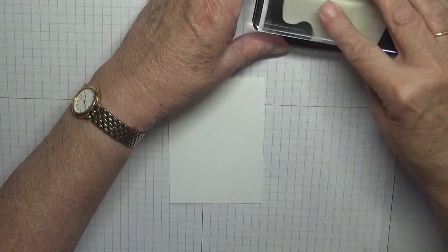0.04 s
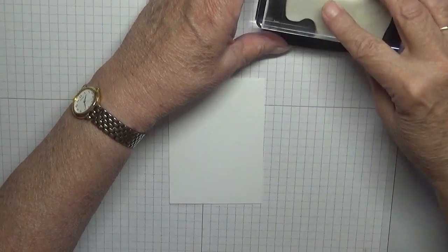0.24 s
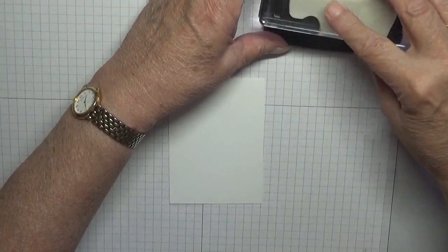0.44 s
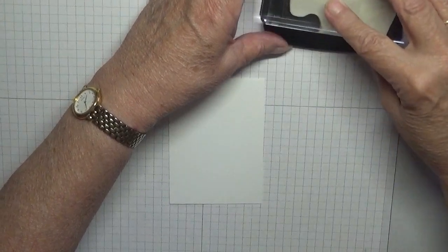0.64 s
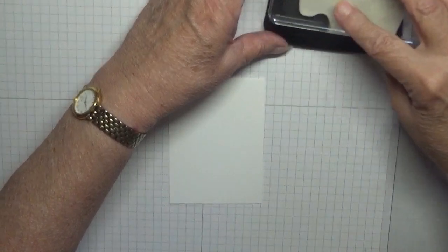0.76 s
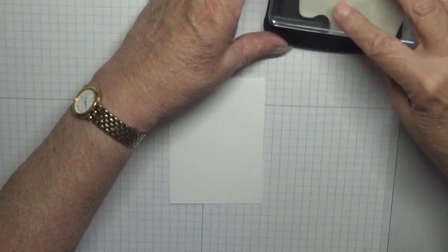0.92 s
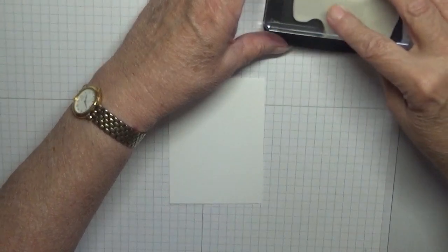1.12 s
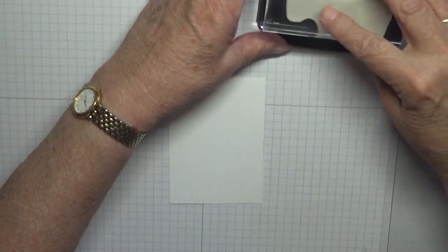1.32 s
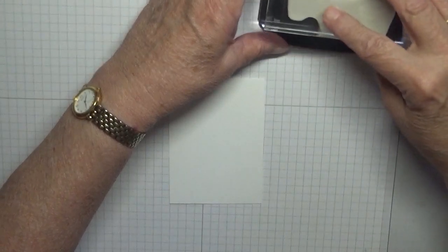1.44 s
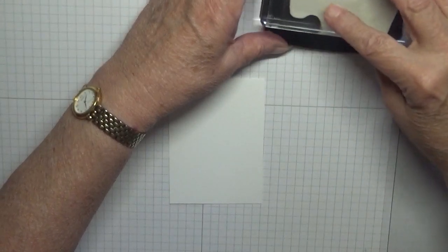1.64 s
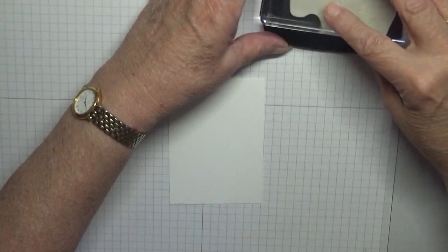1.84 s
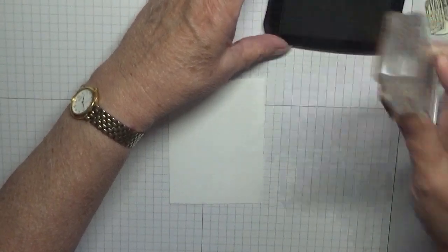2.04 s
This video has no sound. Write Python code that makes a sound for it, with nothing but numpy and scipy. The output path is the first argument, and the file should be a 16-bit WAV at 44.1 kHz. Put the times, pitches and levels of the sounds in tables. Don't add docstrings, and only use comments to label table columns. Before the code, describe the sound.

Quick hollow plastic knocks and low table thumps as a stamp block dabs an ink pad

```python
import sys
import numpy as np
from scipy import signal
from scipy.fft import rfft, irfft, next_fast_len
from scipy.io import wavfile

SR = 44100
rng = np.random.default_rng(int(sys.argv[2]) if len(sys.argv) > 2 else 0)


def wav_record(signal):
    frames = np.transpose(np.atleast_2d(signal))
    bounded = np.clip(frames, -1, 1)
    quanta = np.round(bounded * 32767).astype(np.int16)
    wavfile.write(sys.argv[1], SR, quanta)


def elevation(decibels):
    levels = np.asarray(decibels, float)
    return 10 ** (levels / 20)


N = 91463

KNOCK_RISE_S = .0007
ROOM_LAG_S = .002
WET_CLICK_DB, WET_KNOCK_DB, WET_THUMP_DB = -9.5, -13, -23


def unit(x):
    return x / np.sqrt(np.mean(x ** 2) + 1e-20)


def along(points, hz):
    f, value = np.transpose(points)
    return np.interp(np.log(hz + 1), np.log(f + 1), value)


def bump(hz, centre_hz, db, octaves):
    return db * np.exp(-.5 * (np.log2((hz + 1) / centre_hz) / octaves) ** 2)


def detuning(hz, centre_hz):
    return (hz + 1) / centre_hz - centre_hz / (hz + 1)


def filtered(x, response):
    m = next_fast_len(x.shape[-1] + 8192)
    spectrum = rfft(x, m) * response(np.fft.rfftfreq(m, 1 / SR))
    return irfft(spectrum, m)[..., :x.shape[-1]]


def empty_tracks():
    return np.zeros(N + 2 * SR), np.zeros((2, N + 2 * SR))


def add(track, s, x):
    track[..., SR + round(s * SR):][..., :x.shape[-1]] += x


def ring(hz, db, t60, t):
    return elevation(db[:, None] - 60 * t / t60[:, None]) * np.sin(2 * np.pi * hz[:, None] * t)


# start in seconds, table thump peak in dB, thump tilt in dB per octave,
# case knock in dB, pitch of the favoured case modes in Hz.
TAPS = [
    (-.022, -21, 9, -36.5, 262),
    (0.0237, -36, -8, -51, 306),
    (0.2865, -26, 1, -43, 362),
    (0.54, -23.5, -2.5, -38, 464),
    (0.8069, -23, 0.5, -35, 600),
    (1.0514, -33, -4, -46.5, 417),
    (1.286, -22.5, -1.5, -38, 369),
    (1.5175, -26, 2, -46, 480),
    (1.7199, -50.5, 14, -60, 396),
    (1.7255, -37, -7, -55, 520),
]


def taps():
    near, far = empty_tracks()
    t = np.arange(SR // 2) / SR
    for s, thump_db, thump_tilt, knock_db, spot_hz in TAPS:
        thump = table_thump(thump_db, thump_tilt, t)
        knock = case_knock(knock_db, spot_hz, t)
        add(near, s - .0006, thump)
        add(near, s + .002, knock)
        to_room = elevation(WET_KNOCK_DB) * knock + elevation(WET_THUMP_DB) * thump
        add(far, s + ROOM_LAG_S, room(to_room[:SR // 4]))
    return near, far


# pitch in Hz, level in dB, t60 in seconds, side of the nodal line (sign).
TABLE_MODES = [(40.7, -32.4, 1.25, -1), (66, -17.7, .35, 1), (82.2, -17.4, .25, -1), (91.2, -3.3, .14, 1),
               (112.4, -8.2, .23, -1), (132.2, -4.1, .17, -1), (142.1, -23.9, .52, -1),
               (163.7, -23.6, .46, -1), (169.3, -8.6, .17, 1), (236.5, -21.9, .1, 1)]


def table_thump(db, tilt, t):
    hz, mode_db, t60, side = np.transpose(TABLE_MODES)
    level = mode_db + db + tilt * np.log2(hz / 110)
    return side @ ring(hz, level, t60, t)


# pitch in Hz, level in dB, t60 in seconds.
CASE_MODES = [(210.2, -12.5, 0.28), (243, -8, 0.29), (300, -19, 0.3), (333, -5, 0.13), (345, -7, .2),
              (397.6, -9, 0.17), (428.9, 0, 0.095), (458, -14, 0.21), (499.6, -6, 0.17), (522.2, -3, 0.08),
              (568, -21, 0.098), (642.7, -3.5, 0.074), (729.4, -8.5, 0.097), (857, -13.5, 0.052)]


def case_knock(db, spot_hz, t):
    hz, mode_db, t60 = np.transpose(CASE_MODES)
    favour = bump(hz, spot_hz, 7.5, 0.25)
    level = mode_db + db + favour + 1.01 * rng.standard_normal(len(hz))
    bent_hz = hz * (1 + .006 * rng.standard_normal(len(hz)))
    sign = np.where((hz < 320) | (hz > 600), 1, -1)
    return sign @ ring(bent_hz, level, t60, t) * (1 - np.exp(-t / KNOCK_RISE_S))


# start in seconds, level in dB, pitch in Hz, t60 in seconds.
KNOCK_NOTES = [(-0.001, -45.0, 335.0, 0.2), (0.0003, -51.5, 787.0, 0.141), (0.0225, -39.8, 1095.0, 0.022),
               (0.0248, -54.4, 1532.0, 0.051), (0.0229, -39.5, 2256.0, 0.008),
               (0.0226, -42.3, 3497.0, 0.008), (0.2891, -45.8, 340.0, 0.248), (0.2889, -38.0, 510.0, 0.09),
               (0.2885, -44.2, 638.0, 0.08), (0.289, -51.9, 732.0, 0.237), (0.2873, -30.0, 1259.0, 0.018),
               (0.2874, -37.0, 1751.0, 0.016), (0.2873, -46.8, 2203.0, 0.02),
               (0.2876, -29.6, 3127.0, 0.008), (0.5457, -36.9, 332.0, 0.241), (0.5401, -19.6, 418.0, 0.008),
               (0.5406, -36.0, 526.0, 0.13), (0.5404, -24.1, 635.0, 0.044), (0.5403, -26.1, 868.0, 0.021),
               (0.5395, -31.9, 1278.0, 0.015), (0.5391, -31.0, 1874.0, 0.016),
               (0.5393, -27.4, 2939.0, 0.009), (0.5394, -34.3, 4228.0, 0.018),
               (0.5392, -40.8, 4847.0, 0.017), (0.8094, -31.0, 333.0, 0.13), (0.8084, -28.3, 530.0, 0.061),
               (0.8071, -24.2, 637.0, 0.077), (0.8077, -40.3, 750.0, 0.146), (0.8064, -34.7, 1149.0, 0.064),
               (0.8066, -32.0, 1740.0, 0.018), (0.8069, -37.4, 2325.0, 0.023),
               (0.8069, -27.0, 4250.0, 0.008), (1.0532, -48.0, 333.0, 0.2), (1.0539, -34.7, 433.0, 0.065),
               (1.051, -40.0, 1843.0, 0.018), (1.051, -49.4, 3173.0, 0.018), (0.995, -57.0, 7300.0, 0.012),
               (1.2887, -32.3, 339.0, 0.21), (1.2886, -33.0, 426.0, 0.09), (1.2884, -34.5, 737.0, 0.026),
               (1.2862, -25.9, 936.0, 0.011), (1.2863, -30.6, 1252.0, 0.02), (1.2865, -32.0, 1612.0, 0.016),
               (1.2862, -31.0, 3111.0, 0.008), (1.5247, -46.0, 334.0, 0.2), (1.5199, -32.9, 461.0, 0.047),
               (1.5202, -35.0, 517.0, 0.09), (1.5174, -46.2, 857.0, 0.029), (1.5171, -41.3, 1474.0, 0.027),
               (1.5172, -39.1, 3247.0, 0.018)]


def hollow_knocks():
    near, far = empty_tracks()
    t = np.arange(SR // 4) / SR
    for s, db, hz, t60 in KNOCK_NOTES:
        swell = elevation(db - 60 * t / t60) * (1 - np.exp(-t / KNOCK_RISE_S))
        note = -swell * np.sin(2 * np.pi * hz * t)
        add(near, s, note)
        add(far, s + ROOM_LAG_S, elevation(WET_KNOCK_DB) * room(note))
    return near, far


# pitch in Hz, width in Hz, level in dB.
BLOCK_MODES = [(958, 222, 7.5), (1323, 215, 8), (1500, 255, 7), (1810, 337, 8), (2340, 970, -2.5),
               (2905, 287, 7), (4400, 1600, -8), (5510, 350, 2), (6500, 570, -7.5), (7670, 790, 0),
               (9370, 330, -7.5)]


def block_body(f):
    body = elevation(-9.5) * 1j * f / (900 + 1j * f)
    for k, (hz, width, db) in enumerate(BLOCK_MODES):
        body = body + (-1) ** k * elevation(db) * 1j * f * width / (hz * hz - f * f + 1j * f * width)
    return body


# start in seconds, peak in dB, brightness in dB per octave,
# pitch of the favoured modes in Hz, length in seconds.
CLICKS = [(-.022, -24, -1.5, 2300, 0.0034), (-.014, -29.5, -3.5, 8900, 0.0065),
          (.0001, -45, -8, 3040, 0.006), (.006, -44, 2, 1500, 0.0075), (.0108, -48.5, -4, 2490, 0.0028),
          (.0225, -44, -4, 2200, 0.0035), (.2862, -37.5, -2.5, 1330, .002),
          (.2876, -32.5, -2, 4340, 0.0023), (0.2934, -42.5, -3, 9100, 0.0055),
          (0.5395, -22.5, 1, 4500, 0.0028), (0.5463, -49, -1, 4400, 0.00089),
          (0.548, -27.5, -1, 9200, 0.00078), (0.807, -24, -3, 4845, 0.0024),
          (0.8133, -35, -3, 3400, 0.0016), (0.8149, -28, 0.5, 10000, 0.0022),
          (1.0519, -35.5, 2, 1900, 0.0045), (1.0528, -37, -4, 8760, 0.0029),
          (1.2861, -28.5, -2, 1340, 0.0022), (1.2912, -29.5, 1, 4400, 0.0045),
          (1.5172, -32, -1, 3230, 0.0036), (1.5261, -35, -4, 9050, 0.001), (1.721, -51, 0, 1350, 0.0091)]


def block_clicks():
    near, far = empty_tracks()
    t, lead = np.arange(2048) / SR, 64
    for s, db, tilt, hz, length in CLICKS:
        def colour(f):
            brightness = elevation(tilt * np.log2((f + 500) / 4000))
            favour = 1 + elevation(6) / (1 + 1j * 3.5 * detuning(f, hz))
            return block_body(f) * brightness * favour

        grit = elevation(-21) * rng.standard_normal(len(t)) * np.exp(-(t / length) ** 2)
        touch = grit - (t == 0)
        click = filtered(np.pad(touch, (lead, 0)), colour)
        click *= elevation(db) / np.abs(click).max()
        add(near, s - lead / SR, click)
        add(far, s + ROOM_LAG_S, elevation(WET_CLICK_DB) * room(click))
    return near, far


# start in seconds, level in dB, centre in Hz, length
# in seconds.
INK_CRACKLES = [
    (.188, -62, 9300, .007),
    (.274, -70, 9000, .0068),
    (.515, -75, 3150, .022),
    (.937, -66, 8800, .006),
    (.938, -66, 1500, .005),
    (.966, -67, 9500, .008),
    (.99, -68, 5000, .006),
    (1.185, -66.5, 8500, .032),
    (1.878, -68, 3800, .043),
    (1.885, -70, 9300, .025),
                (.282, -67, 4300, 0.0052),
]


def ink():
    out = empty_tracks()[0]
    t = np.arange(4096) / SR
    for s, db, hz, length in INK_CRACKLES:
        unevenness = elevation(5 * rng.standard_normal(len(t) // 32)).repeat(32)
        grains = rng.standard_normal(len(t)) * unevenness
        band = unit(filtered(grains, lambda f: (1 + 1j * .9 * detuning(f, hz)) ** -2.0))
        swell = np.sin(np.pi * np.clip(t / length, 0, 1))
        add(out, s, elevation(db) * band * swell)
    return out


# frequency in Hz, t60 in seconds.
ROOM_DECAY = [(300, .3), (1500, 0.24), (4000, 0.16), (10000, 0.094)]


def room(x):
    hz, t, z = signal.stft(rng.standard_normal((2, SR // 3)), SR, nperseg=256)
    decay = elevation(-60 * t / along(ROOM_DECAY, hz)[:, None])
    mid, side = signal.istft(z * decay, SR, nperseg=256)[1]
    tail = mid + elevation(-4) * side * [[1], [-1]]
    tail = tail * np.cos(np.linspace(0, np.pi / 2, tail.shape[1]))
    return signal.fftconvolve(x[None], tail / np.linalg.norm(tail[0]), axes=1)


# pitch in Hz, level in dB, t60 in seconds, lag in seconds.
DRIVE_MODES = [(2455, -58.5, 0.034, 0.001965), (3260, -47, 0.0089, 0.00022), (4550, -56, 0.015, .001)]


def drive_ticks():
    ticks = empty_tracks()[0]
    t = np.arange(1024) / SR
    for k, s in enumerate(np.arange(.031, N / SR, .04)):
        step_db = -1.5 * (k % 2 == 0)
        for hz, db, t60, lag in DRIVE_MODES:
            bend, size = rng.standard_normal(2)
            level = db + 1.5 * size + step_db
            swell = elevation(level - 60 * t / t60) * (1 - np.exp(-t / 0.0026))
            pitch = hz * (1.03 + .012 * bend - 4.5 * t)
            add(ticks, s + lag, swell * np.sin(2 * np.pi * pitch * t))
    return ticks[SR:SR + N]


# pitch in Hz, rms level in dB.
WHINE = [(7800, -85), (101.5, -78), (50.3, -78)]


def whine():
    t = np.arange(N) / SR
    return sum(elevation(db) * np.sqrt(2) * np.sin(2 * np.pi * hz * t) for hz, db in WHINE)


# frequency in Hz, level in dB per Hz.
HISS_COLOUR = [(18, -10), (30, -1), (395, -1.5), (458, -4.5), (664, -2.5), (917, -4), (1060, -5.5),
               (2940, -9), (11200, -16.5), (14600, -73), (22000, -120)]
# frequency in Hz, left-right likeness (1 is mono).
HISS_LIKENESS = [(60, 1), (220, 0.57), (810, 0.02), (2980, 0.2), (11000, 0.84)]


def hiss():
    def spread(hz):
        angle = np.arccos(np.clip(along(HISS_LIKENESS, hz), -1, 1)) / 2
        return elevation(along(HISS_COLOUR, hz)) * [np.cos(angle), np.sin(angle)]

    mid, side = filtered(rng.standard_normal((2, N)), spread)
    return elevation(-63.5) * unit(np.array([mid + side, mid - side]))


def table_hollow(f):
    centre, width, depth_db = 275, 110, -14
    stiffness, damping = centre ** 2 - f * f, 1j * f * width
    return (stiffness + damping * elevation(depth_db)) / (stiffness + damping)


def off_centre(f):
    pan_db, skew_s = .1, .000007
    skew = np.exp(1j * np.pi * f * skew_s * np.array([[1], [-1]]))
    return elevation([[pan_db], [-pan_db]]) * skew


def scene():
    thud, thud_room = taps()
    note, note_room = hollow_knocks()
    click, click_room = block_clicks()
    near = filtered(thud + note, table_hollow) + click + ink()
    lead = 4096
    pair = filtered(near[SR - lead:SR + N], off_centre)[:, lead:]
    far = (thud_room + click_room + note_room)[:, SR:SR + N]
    return pair + far + hiss() + drive_ticks() + whine()


def low_pass(x):
    return signal.sosfilt(signal.butter(12, 11570, fs=SR, output="sos"), x)


def record(dry):
    mix = filtered(dry, lambda hz: 1 / np.sqrt(1 + (hz / 10980) ** 110))
    return low_pass(mix)


dry = scene()
out = record(dry)
wav_record(out)
```